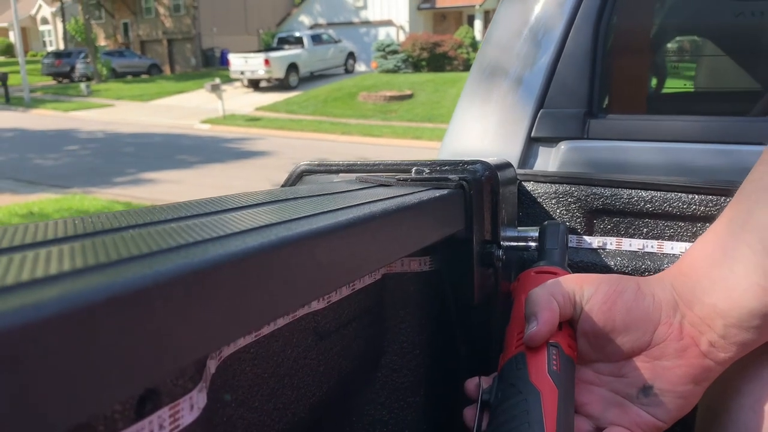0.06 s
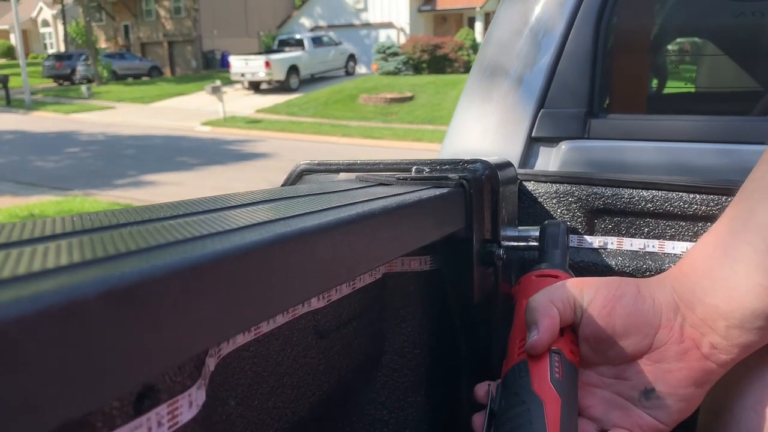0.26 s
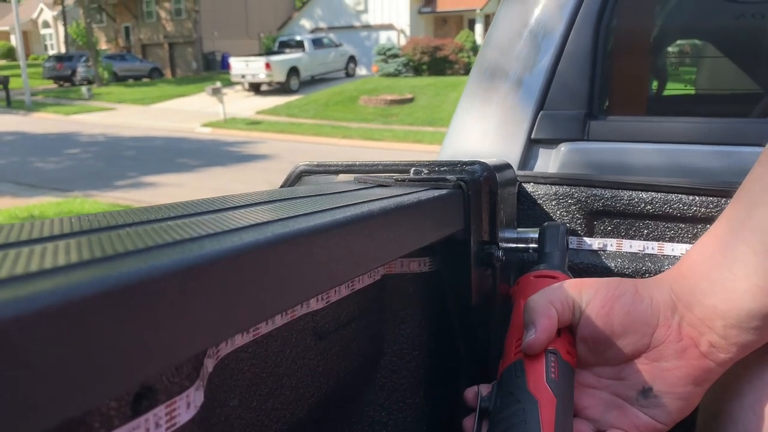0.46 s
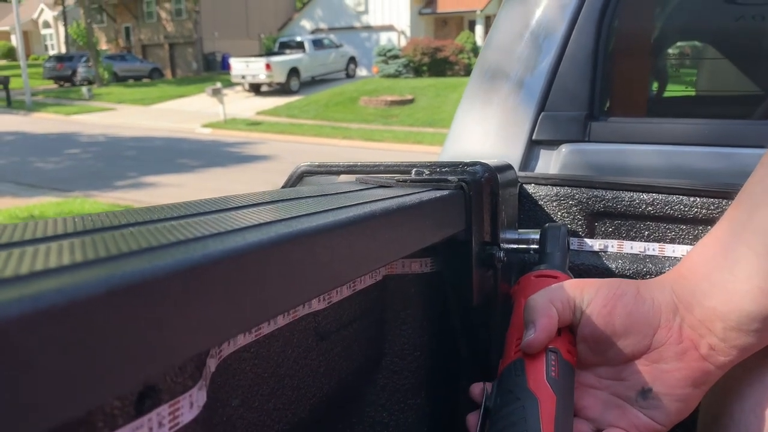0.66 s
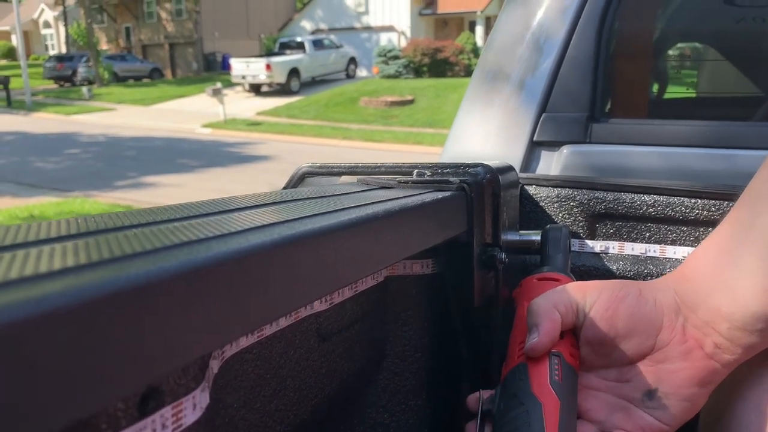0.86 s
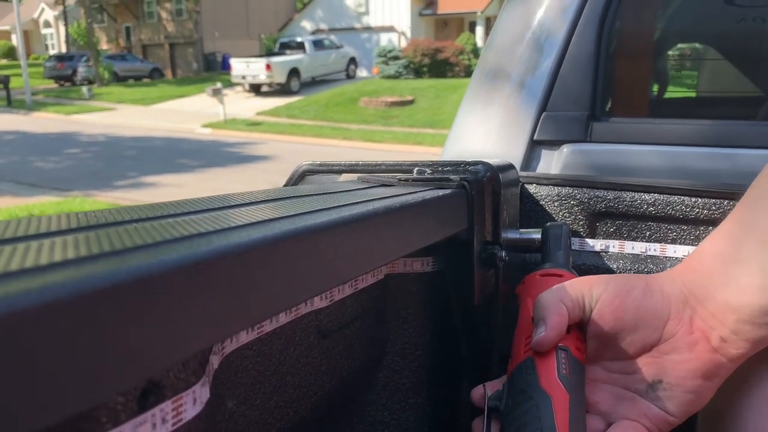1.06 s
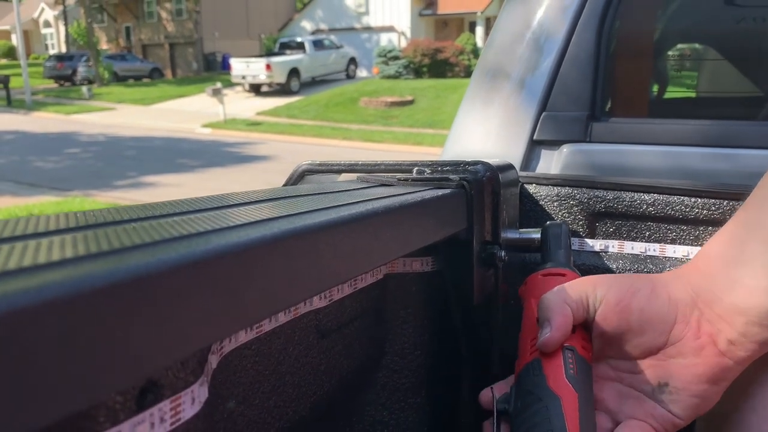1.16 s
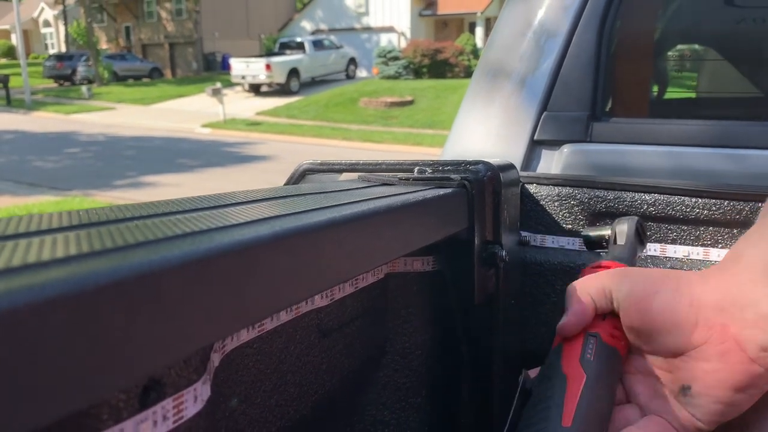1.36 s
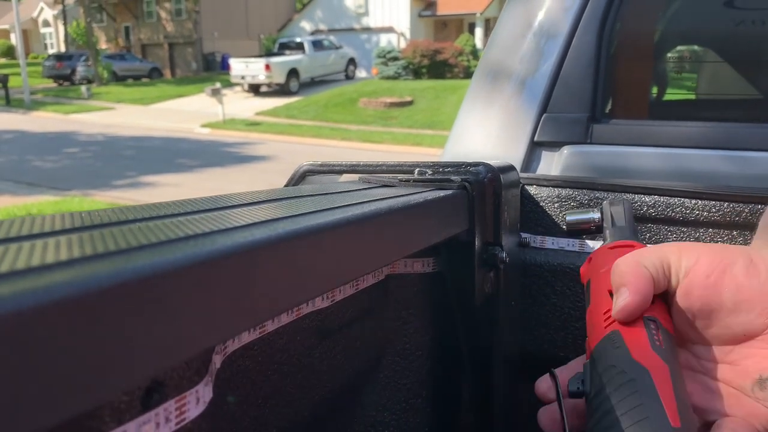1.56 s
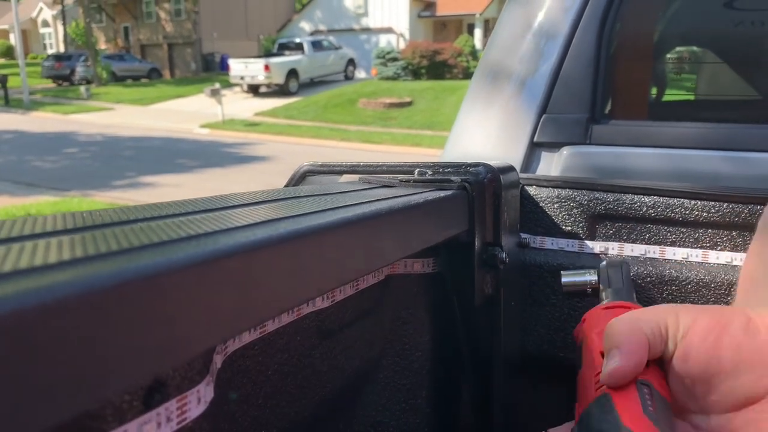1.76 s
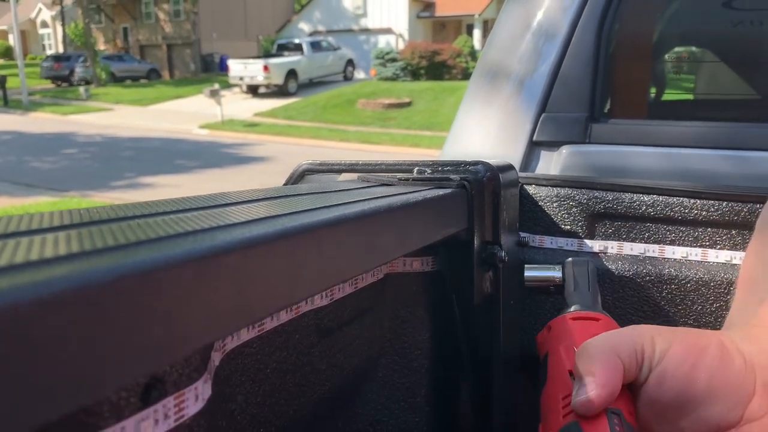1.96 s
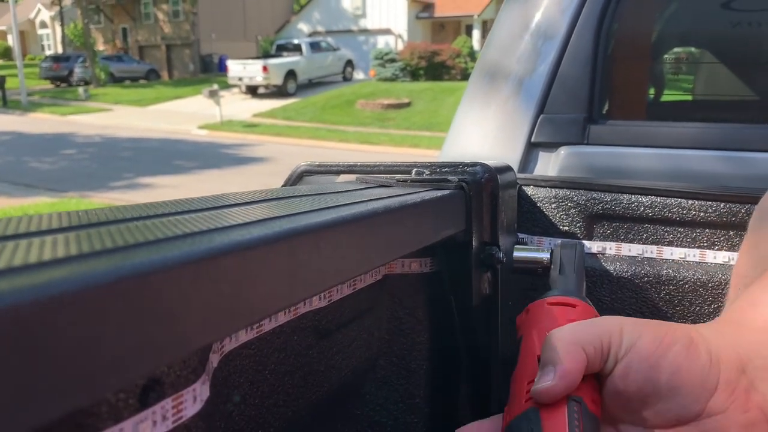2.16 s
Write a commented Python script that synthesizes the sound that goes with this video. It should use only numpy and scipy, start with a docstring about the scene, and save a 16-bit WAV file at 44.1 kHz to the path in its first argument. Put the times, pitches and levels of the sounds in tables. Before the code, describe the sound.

Electric ratchet chatters briefly twice on a metal clamp, shaking a truck bed outdoors, then clinks.

```python
"""Cordless ratchet on a clamp in a pickup bed

Outdoors, a nut is run down in two short bursts. Chopped current makes the motor whine, random grains of
noise make the gear rattle and short bright noise the pawl ticks; knocks excite modes of clamp and bed.
The socket is pulled off with a clink of noise and modes, then rattles lightly on the tool.
Shaped noise forms the shaking bed and the outdoor air; two wavering sines hum as a distant engine."""
import sys
import numpy as np
from scipy import signal
from scipy.fft import rfft, irfft, next_fast_len
from scipy.io import wavfile
from scipy.ndimage import uniform_filter1d

SR = 44100
rng = np.random.default_rng(int(sys.argv[2]) if len(sys.argv) > 2 else 0)


def dump_mix(stems):
    """Bounce the given channels to the path in sys.argv[1] as a 16-bit WAV at rate SR."""
    frames = np.atleast_2d(stems).T  # one column per channel
    limited = np.clip(frames, -1, 1)  # hard clip at full scale
    pcm = np.round(limited * 32767).astype(np.int16)
    wavfile.write(sys.argv[1], SR, pcm)


N = 97020  # length in samples

# Spectrum of gear and pawl noise. Each row: frequency in Hz, relative density in dB.
GEAR_COLOUR = [(150, -15.5), (500, 7.5), (1100, 1), (1900, 4.5), (3500, -3), (5500, -3.5), (6900, -4.5),
               (9000, -4), (13200, -7), (16200, -10)]
# Modes of the clamp bracket. Each row: frequency in Hz, relative level in dB, 60 dB decay time in s.
BRACKET_MODES = [(327.6, -4, 0.14), (468, -22.5, 0.22)]
# Coherence of the two sides. Each row: frequency in Hz, correlation from -1 to 1.
LIKENESS = [(60, 0.97), (130, 0.98), (290, 0.832), (640, 0.2), (5000, 0.48), (8000, 1)]

WHINE_HZ = 1845  # mean chopping rate, also the pitch of the running motor
RING_S = 0.45  # length computed for every blow and ring


def strokes(clamp_db=-8):
    """Impact excitation: each drive stroke knocks socket and clamp and sets the bed modes ringing."""
    # Each row: start in seconds, knock level in dB, brightness in dB per octave, bed thump in dB.
    blows = [(0.2247, -11.5, -2.5, -22), (0.2487, -12, -2.5, -18.5), (.269, -12, 4, -16.5),
             (.286, -17, 5.5, -16.5), (0.3045, -12, 5.5, -19), (0.3204, -15.5, 1, -16),
             (0.3358, -14, 8.5, -15), (.352, -16.5, 1.5, -32), (0.367, -26.5, 1.5, -16.5),
             (0.387, -15.5, -6, -20), (0.4208, -18.5, -1, -14), (0.435, -28.5, -20, -31.5),
             (0.4675, -20, -2.5, -23), (.513, -50, -16, -22.5), (.664, -30.5, -3.5, -30.5),
             (0.7418, -28, -0.5, -27.5), (.757, -12.5, 0, -9), (0.766, -19, 1.5, -8.5),
             (0.7825, -12, -0.5, -10.5), (0.8553, -25.5, -8.5, -26), (0.8604, -25.5, -6, -26)]
    # The nut seats and jolts the bracket. Each row: start in seconds, level in dB.
    jolts = [(.759, -14), (.79, -27)]
    # Spectrum of the knock. Each row: frequency in Hz, relative density in dB.
    knock_colour = [(120, -26), (350, -6.5), (700, -2), (950, 1), (1250, -2.5), (1900, -1), (2700, 0.5),
                    (3400, -3), (4200, -4.5), (5300, -6.5), (6800, -9), (9000, -9), (15000, -34.5)]
    # Modes of clamp, then of truck bed. Each row: frequency in Hz, level in dB, 60 dB decay time in s.
    clamp_modes = [(1044.6, -6.5, .06), (1296, -8, .06), (1659, -5, .05), (2326, -0.5, 0.033),
                   (2757, -9, .06), (3430, -3.5, 0.083), (4700, -12, .05)]
    bed_modes = [(58.3, -17.5, 0.65), (113.52, -13.5, 0.65), (127, -10, 0.32), (170.3, -0.5, 0.17),
                 (260.3, -2, 0.16), (320.1, -1.5, 0.11), (452.8, -8, 0.066), (512.8, -8, 0.12),
                 (610, -16.5, 0.05), (675, -22, 0.033)]

    out = np.zeros((2, N))
    bed_thump = thump(bed_modes, rise_s=0.012)
    for s, db, tilt_db, thump_db in blows:
        knock = burst(knock_colour, tilt_db, rise_s=0.0027, t60=0.045, tail_db=-14.5)
        add(out, s, amp(db) * knock)
        add(out, s, amp(db + clamp_db) * clang(clamp_modes, 0))
        add(out, s, amp(thump_db) * bed_thump)
    for s, db in jolts:
        add(out, s, amp(db) * thump(BRACKET_MODES, rise_s=0.0047))
    return out


def pawl(width_octaves=0.521, skirt_db=-16, tick_t60=0.014, ring_db=-20, ring_t60=0.052):
    """Snap over a tooth: brief broadband noise peaked at one frequency, with a two-stage decay."""
    # Each row: start in seconds, relative level in dB, centre of the spectral peak in Hz.
    ticks = [(.216, -14, 13000), (0.2228, -15.5, 10000), (.243, -13, 13300), (0.2465, -13, 10100),
             (.249, -12, 9500), (0.261, -16, 10000), (0.2657, -16, 10100), (0.283, -12.5, 13100),
             (.2945, -17, 9500), (.305, -19, 9550), (0.3196, -10.5, 9540), (0.3344, -10, 9500),
             (0.356, -17, 9440), (.407, -24, 9700), (0.4188, -21, 8600), (.4465, -25.5, 12000),
             (.467, -28, 10200), (.713, -44, 13600), (.725, -48, 13000), (0.747, -16, 10400),
             (0.756, -16.5, 11300), (0.773, -18, 14000), (0.784, -26, 9500), (0.8151, -17, 15000)]

    out = np.zeros((2, N))
    t = np.arange(4096) / SR
    decay = amp(-60 * t / tick_t60) + amp(ring_db - 60 * t / ring_t60)
    grid = np.geomspace(500, 20000, 40)  # Hz
    for s, db, hz in ticks:
        octaves = np.log2(grid / hz)
        peak = np.exp(-(octaves / width_octaves) ** 2) + amp(skirt_db) * grid / hz
        colour_db = 20 * np.log10(peak) + read(GEAR_COLOUR, grid)
        tick = decay * noise(len(t), list(zip(grid, colour_db)))
        add(out, s, amp(db - 1.0) * tick)
    return out


def gears(teeth_per_s=900, spread_db=2.5, tooth_s=0.00083, rub=0.076, whine_db=-9):
    """Shot noise: random tooth contacts modulate a rubbing noise beside the tone of the motor."""
    # One list per burst. Each row: time in seconds, envelope level in dB.
    runs = [
        [(.15, -61.5), (.192, -43.5), (.21, -28.5), (.245, -17.5), (.33, -20.5), (.37, -22), (.40, -30.5),
         (.46, -40.5), (.48, -42.5), (.50, -55), (.53, -64)],
        [(.655, -68), (.667, -59.5), (.72, -47.5), (.738, -33), (.762, -30), (.795, -36), (.83, -44),
         (.875, -41), (.905, -72)],
    ]

    contacts = rng.random(N) < teeth_per_s / SR
    hits = contacts * amp(spread_db * rng.standard_normal(N))
    # Each contact decays by 1/e in power over tooth_s.
    power = signal.lfilter([1], [1, -np.exp(-1 / (tooth_s * SR))], hits)
    grain = np.sqrt(power / power.mean() + rub)
    chatter = steadied(grain * noise(N, GEAR_COLOUR), smooth_s=0.008)
    motor = np.sin(2 * np.pi * WHINE_HZ * np.arange(N) / SR + wander(N, 60))
    return (chatter + amp(whine_db) * motor) * sum(level(run) for run in runs)


def whine(flutter_db=4.5):
    """Pulse-width modulation: chopped motor current sings as its pulses widen with the closing trigger."""
    # Soft starts of the motor. Each row: start in seconds, length in seconds, level in dB.
    starts = [(.141, 0.062, -43.5), (0.648, 0.073, -46.5)]
    # Weight in dB of each multiple of the chopping rate, from the first, before the pulse-width factor.
    harmonics_db = [5, -9, -5.5, -6.5, -9.5, -11.5, -15, -18.5]
    duty_start, duty_end, duty_ramp_s = 0.054, 0.48, 0.047  # share of each cycle with current on
    rate_jitter, rise_s, fall_s = 0.004, 0.0055, 0.011  # jitter as an rms share of the rate

    out = np.zeros((2, N))
    for s, length, db in starts:
        t = np.arange(int(length * SR)) / SR
        turns = np.cumsum(WHINE_HZ * (1 + rate_jitter * wander(len(t), 200))) / SR
        shape = np.minimum(t / rise_s, 1) * np.minimum((length - t) / fall_s, 1)
        duty = duty_end + (duty_start - duty_end) * np.exp(-t / duty_ramp_s)
        for k, part_db in enumerate(harmonics_db, 1):
            pulse_gain = np.sin(np.pi * k * duty)  # Fourier term of a pulse of this width
            phase = 2 * np.pi * (k * turns + rng.random())
            # The added phase wander is largest on the lowest line.
            tone = pulse_gain * np.sin(phase + wander(len(t), 60) / (k + 1))
            gain = amp(db + part_db + flutter_db * wander(len(t), 90))
            add(out, s, gain * shape * tone)
    return out


def socket(modes_db=-8, loose_db=-5):
    """Modal impact: the socket scrapes off the nut and rings, then rattles loosely on the tool."""
    # Each row: start in seconds, level in dB, brightness in dB per octave, push on the bracket in dB.
    clinks = [(1.213, -41, -6, -76), (1.2208, -33.5, -2, -32), (1.2313, -24.5, 5, -58),
              (1.2351, -22, 0, -55), (1.238, -26, -4, -23), (1.302, -52, -6, -66)]
    # Socket and pawl in the hand. Each row: start in seconds, level in dB, noise brightness in dB per octave.
    rattles = [(1.526, -37.5, 8), (1.5419, -37, 1), (1.547, -43.5, -9.5), (1.681, -42.5, -3.5),
               (1.724, -52, 2), (1.7344, -43, 1), (1.781, -39, 0), (1.9951, -45, -3)]
    # Spectra of clink and rattle. Each row: frequency in Hz, relative density in dB.
    clink_colour = [(150, -45), (330, -18), (620, -12), (950, 2), (1500, -4.5), (3000, 1.5), (6000, -10),
                    (9500, -10.5), (14500, -20), (16000, -39)]
    rattle_colour = [(300, -33.5), (680, -28.5), (880, 3), (1100, -9), (1400, 0.5), (3800, -10),
                     (5500, -20), (8000, -20), (10000, -29.5), (16000, -39.5)]
    # Modes of socket and clamp, then of the loose socket on its square drive.
    # Each row: frequency in Hz, relative level in dB, 60 dB decay time in s.
    socket_modes = [(816, -15, 0.18), (1135, -3, 0.053), (1503, -7.5, 0.11), (1893, -9, 0.15),
                    (2770, -1.5, 0.086), (3310, -7, 0.095), (4190, -8.5, 0.09), (4687, 2, 0.058),
                    (5800, -14, 0.046), (6920, 0.5, 0.065), (8820, 1.5, 0.021), (9900, -5.5, 0.036)]
    loose_modes = [(857, -7, 0.085), (1382, -6, 0.04), (1890, -3, 0.042), (2227, -4, 0.052),
                   (3300, -12.5, 0.043), (3970, -4.5, 0.049), (6850, -18.5, 0.053), (11000, -13.5, 0.047)]

    out = np.zeros((2, N))
    for s, db, tilt_db, push_db in clinks:
        scrape = burst(clink_colour, tilt_db, rise_s=0.0018, t60=0.042, tail_db=-14.5)
        add(out, s, amp(db) * (scrape + amp(modes_db) * clang(socket_modes, tilt_db)))
        add(out, s, amp(push_db) * thump(BRACKET_MODES, rise_s=0.014))
    for s, db, tilt_db in rattles:
        tap = burst(rattle_colour, tilt_db, rise_s=0.0008, t60=0.039, tail_db=-18.5)
        add(out, s, amp(db) * (tap + amp(loose_db) * clang(loose_modes, tilt_db / 2)))
    return out


def housing(x, ripple_db=2.5, ripple_hz=130):
    """Minimum-phase filtering: sounds inside the tool share a few strong and many weak resonances."""
    # Resonances of tool and clamp. Each row: frequency in Hz, width in Hz, boost in dB.
    resonances = [(749, 31, 5), (1108, 18.54, 4), (2580, 72, 4.5), (5300, 130, 1), (8900, 80, -0.5)]

    size = 8192
    hz = np.fft.rfftfreq(size, 1 / SR)
    lag = np.arange(size) / SR
    # Noise confined to short lags gives a smooth random ripple over frequency.
    ripple = rfft(rng.standard_normal((2, size)) * np.exp(-(lag * ripple_hz) ** 2)).real
    db = ripple_db * unit(ripple) * np.minimum(hz / 2000, 1)
    db = db + sum(boost / (1 + (2 * (hz - f) / width) ** 2) for f, width, boost in resonances)
    # Folding the cepstrum onto positive lags makes the response minimum phase.
    cepstrum = irfft(np.log(amp(db)))
    cepstrum[:, 1:size // 2] *= 2
    cepstrum[:, size // 2 + 1:] = 0
    response = irfft(np.exp(rfft(cepstrum)))
    response = response / np.linalg.norm(response, axis=1, keepdims=True)
    return signal.fftconvolve(x, response, axes=1)[:, :N]


def ports(x, delay_s=0.0002189, corner_hz=1200):
    """Interaural-style time difference: the tool reaches the left side later, except in the bass."""
    hz = np.fft.rfftfreq(N, 1 / SR)
    delay = delay_s * hz ** 4 / (hz ** 4 + corner_hz ** 4)
    left = irfft(rfft(x[0]) * np.exp(-2j * np.pi * hz * delay), N)
    return np.array([left, x[1]])


def bed_shake():
    """Forced vibration: the truck bed shakes and rumbles as coloured noise under slow envelopes."""
    # Envelopes of shaking and deep rumble. Each row: time in seconds, level in dB.
    shake = [(.16, -36), (.21, -30), (.255, -19.5), (.33, -22.5), (.42, -18), (.51, -23), (.60, -43.5),
             (.695, -26), (.745, -29), (.785, -15), (.88, -25.5), (.98, -43), (1.04, -47), (1.22, -51.5),
             (1.27, -38), (1.4, -58)]
    rumble = [(.18, -46.5), (.30, -16.5), (.37, -34), (.45, -40), (.535, -23), (.63, -31.5), (.72, -26.5),
              (.79, -26.5), (.86, -34.5), (.94, -26.5), (1.04, -44.5)]
    # Spectra of shaking and deep rumble. Each row: frequency in Hz, relative density in dB.
    shake_colour = [(30, -55), (55, -15), (85, -1), (115, 6), (170, -2), (215, -13.5), (260, -6),
                    (335, -11), (395, -25), (495, -14.5), (620, -32), (1000, -32), (2000, -50), (6000, -73)]
    rumble_colour = [(33, -46), (43, -18.5), (57, -6), (85, -3), (130, -16), (1000, -93)]

    shaking = level(shake) * steadied(noise(N, shake_colour))
    return shaking + level(rumble) * steadied(noise(N, rumble_colour))


def street(air_db=-43.5, hum_db=-1.5, second_db=-17):
    """Ambient field: steady coloured air noise with a two-harmonic, frequency-modulated engine hum."""
    # Distant engine. Each row: time in seconds, mean pitch in Hz, level in dB before the hum_db gain.
    engine = [(0, 77.2, -35.5), (0.149, 78.7, -35), (1.0, 77.74, -49), (1.2, 77.2, -46.5),
              (1.38, 79.5, -36.5), (1.549, 82.73, -40.5), (1.72, 79.46, -45), (1.9, 83.4, -41),
              (2.05, 83.7, -45.5), (2.12, 83.5, -57), (2.2, 85.3, -41)]
    # Spectrum of outdoor air. Each row: frequency in Hz, relative density in dB.
    air_colour = [(28, -28), (55, 3), (90, 3.5), (130, -10.5), (240, -12.5), (330, -26), (430, -19),
                  (680, -28), (2400, -34.5), (5000, -46), (9000, -57.5), (16000, -67.5)]
    # Coherence of the air. Each row: frequency in Hz, left-right correlation.
    air_likeness = [(60, 1), (300, 0.31), (2000, 0.086)]

    t = np.arange(N) / SR
    s, hz, db = np.transpose(engine)
    pitch = np.interp(t, s, hz) * (1 + 0.015 * wander(N, 4.2))
    phase = 2 * np.pi * np.cumsum(pitch) / SR
    tone = np.sin(phase) + amp(second_db) * np.sin(2 * phase)
    hum = amp(np.interp(t, s, db) + 1.5 * wander(N, 14)) * tone
    air = amp(air_db) * noise(N, air_colour, same=air_likeness)
    return np.sqrt(2) * amp(hum_db) * hum * sides(hz[0]) + air


def burst(colour, tilt_db, rise_s, t60, tail_db):
    """Dense modal decay: a quick noise crack, then a tail whose bands die at their own rates."""
    # Ring of the bed walls. Each row: band centre in Hz, 60 dB decay time in s.
    wall_decay = [(200, 0.1), (800, 0.2), (3000, 0.17), (8000, .14), (15000, 0.066)]

    t = np.arange(next_fast_len(int(RING_S * SR))) / SR
    hz = np.fft.rfftfreq(len(t), 1 / SR)
    centres = [f for f, _ in wall_decay]
    wash = rfft(noise(len(t), colour, tilt_db))
    tail = 0
    # Overlapping triangular bands on a log-frequency axis sum to the whole spectrum.
    for weights, (_, decay) in zip(np.eye(len(centres)), wall_decay):
        band = irfft(wash * read(list(zip(centres, weights)), hz), len(t))
        tail = tail + band * amp(-60 * t / decay)
    crack = steadied(noise(len(t), colour, tilt_db), smooth_s=0.003) * amp(-60 * t / t60)
    return np.minimum(t / rise_s, 1) * (crack + amp(tail_db) * tail)


def ring(modes, tilt_db=0):
    """Modal synthesis: damped sines, set out of phase between the sides where coherence is low."""
    t = np.arange(int(RING_S * SR)) / SR
    out = 0
    for hz, db, t60 in modes:
        skew = np.array([[0.5], [-0.5]]) * np.arccos(np.clip(read(LIKENESS, hz), -1, 1))
        envelope = amp(db + tilt_db * np.log2(hz / 3000) - 60 * t / t60)
        out = out + sides(hz) * envelope * np.sin(2 * np.pi * hz * t + skew)
    return out


def thump(modes, rise_s):
    """Soft excitation: the modes of a large part swell smoothly after one push."""
    body = ring(modes)
    rise = np.minimum(np.arange(body.shape[1]) / SR / rise_s, 1)
    return body * np.sin(np.pi / 2 * rise) ** 2


def clang(modes, tilt_db, rise_s=0.00084, vary_db=3.0):
    """Strike-point dependence: metal modes ring with slightly different weights at each blow."""
    struck = [(hz, db + vary_db * rng.standard_normal(), t60) for hz, db, t60 in modes]
    body = ring(struck, tilt_db)
    return body * np.minimum(np.arange(body.shape[1]) / SR / rise_s, 1)


def noise(n, colour, tilt_db=0, same=LIKENESS):
    """Partial coherence: mid and side noises mix to a given spectrum and left-right correlation."""
    hz = np.fft.rfftfreq(n, 1 / SR)
    a, b = rfft(rng.standard_normal((2, n)))
    c = np.clip(read(same, hz), -0.999, 0.999)
    mid, side = a * np.sqrt(1 + c), b * np.sqrt(1 - c)
    shape = amp(read(colour, hz) + tilt_db * np.log2(np.maximum(hz, 500)))  # tilted above 500 Hz
    return unit(irfft(np.array([mid + side, mid - side]) * shape * sides(hz), n))


def sides(hz):
    """Interchannel level difference: left and right gain at a frequency."""
    # Each row: frequency in Hz, left minus right in dB.
    balance = [(60, -2), (200, -4), (380, -2), (700, 4.5), (1300, 1.5), (2400, -0.5), (8000, -0.5)]
    return amp(np.array([[0.5], [-0.5]]) * read(balance, hz))


def steadied(x, smooth_s=0.035):
    """Envelope normalisation: divides out slow swells of a noise and keeps its quick grain."""
    width = max(int(smooth_s * SR), 2)
    power = uniform_filter1d((x ** 2).mean(0), width)
    return unit(x / np.sqrt(uniform_filter1d(power, width) + 1e-9))


def wander(n, hz):
    """Low-pass random process: smooth chance up to a rate, scaled to rms 1 over the full length."""
    f = np.fft.rfftfreq(N, 1 / SR)
    return unit(irfft(rfft(rng.standard_normal(N)) / (1 + (f / hz) ** 4), N))[:n]


def level(points):
    """Amplitude envelope: gain from (s, dB) points, fading smoothly to silence outside them."""
    s, db = np.transpose(points)
    t = np.arange(N) / SR
    outside = np.maximum(np.maximum(s[0] - t, t - s[-1]), 0)
    return amp(np.interp(t, s, db)) * np.exp(-(outside / 0.015) ** 2)


def read(points, hz):
    """Logarithmic frequency scale: interpolates (Hz, value) points."""
    f, value = np.transpose(points)
    return np.interp(np.log(hz + 1), np.log(f + 1), value)


def add(mix, s, sound):
    """Superposition: mixes a sound in at a time in seconds."""
    part = mix[:, round(s * SR):][:, :sound.shape[-1]]
    part += sound[..., :part.shape[1]]


def amp(db):
    """Decibel law: level to amplitude gain."""
    return 10 ** (np.asarray(db) / 20)


def unit(x):
    """Power normalisation: scales to rms 1."""
    return x / np.sqrt(np.mean(x ** 2) + 1e-20)


def scene():
    """Superposition of tool, truck bed and street."""
    tool = housing(strokes() + pawl() + gears()) + whine() + socket()
    return ports(tool) + bed_shake() + street()


def record(dry):
    """Band limitation: a linear-phase low-pass at 15.8 kHz."""
    lowpass = signal.firwin(255, 15800, window=("kaiser", 8), fs=SR)
    return signal.oaconvolve(dry, lowpass[None], "same")


dry = scene()
out = record(dry)
dump_mix(out)
```